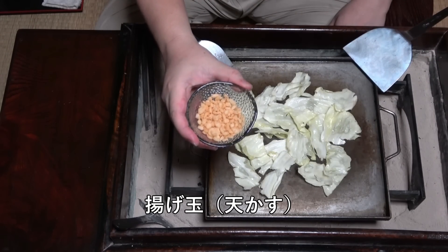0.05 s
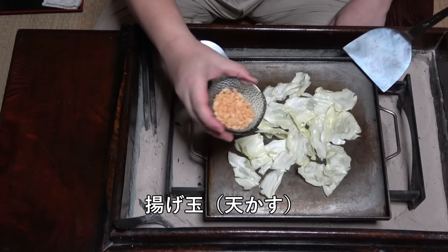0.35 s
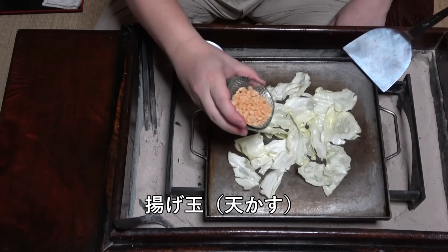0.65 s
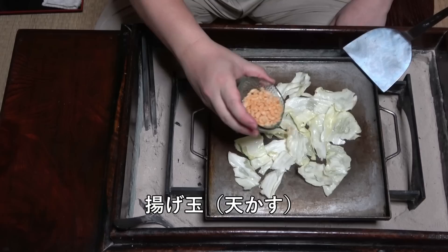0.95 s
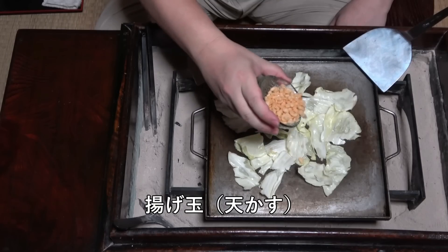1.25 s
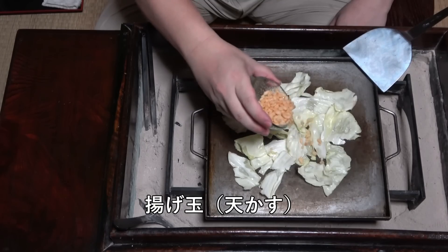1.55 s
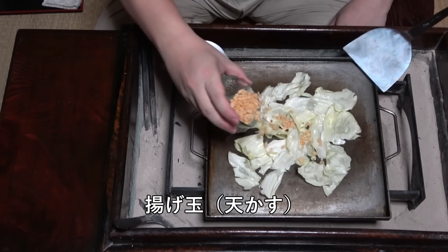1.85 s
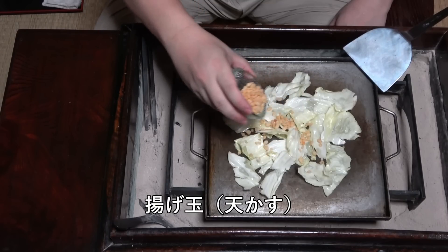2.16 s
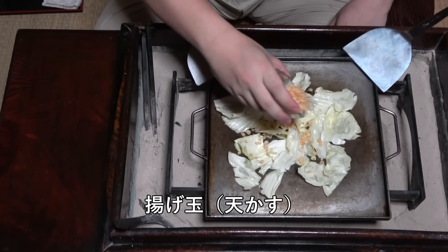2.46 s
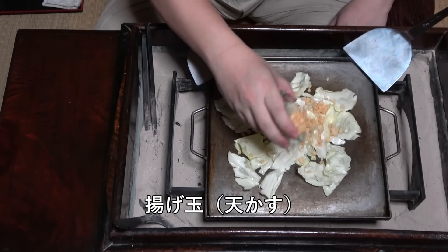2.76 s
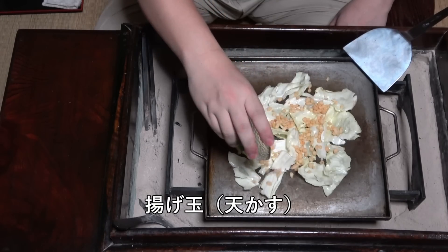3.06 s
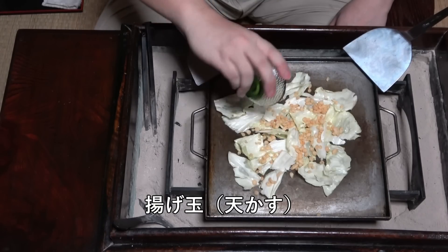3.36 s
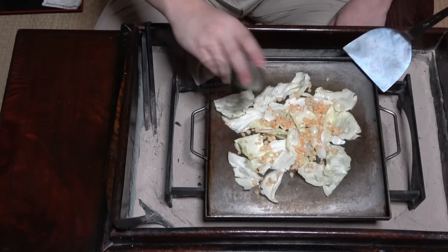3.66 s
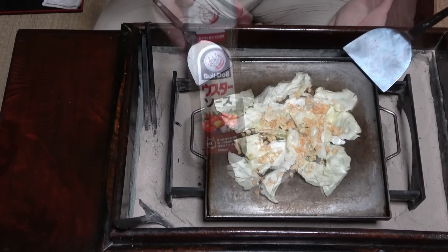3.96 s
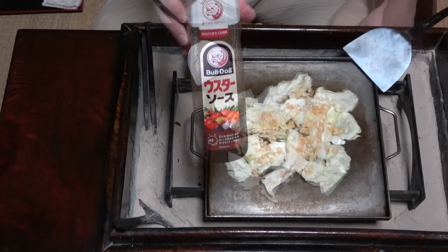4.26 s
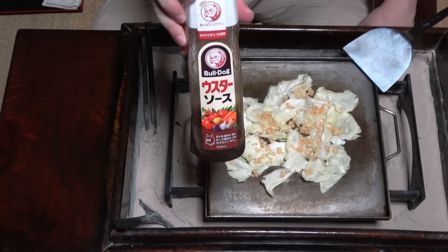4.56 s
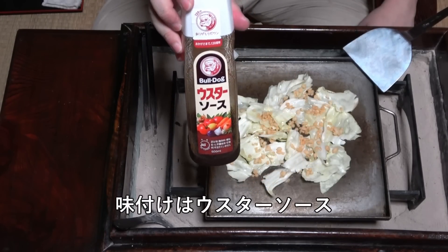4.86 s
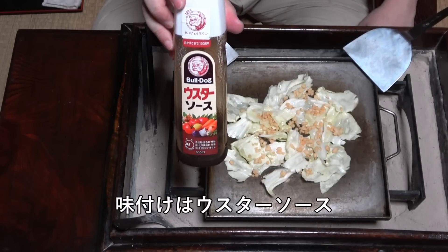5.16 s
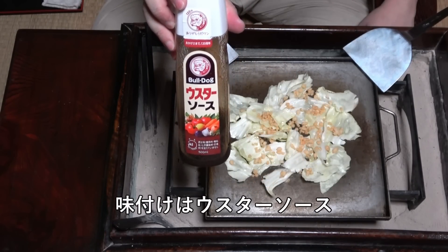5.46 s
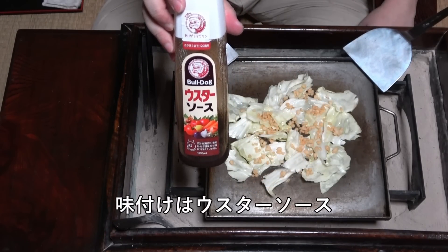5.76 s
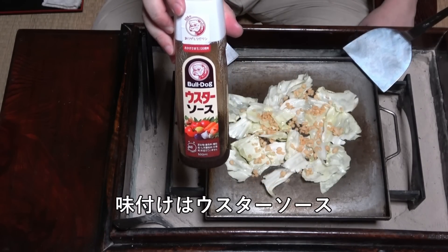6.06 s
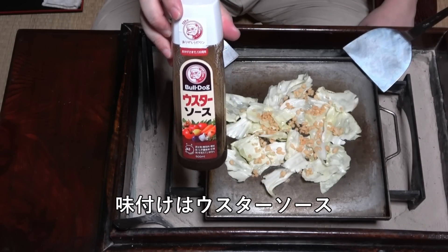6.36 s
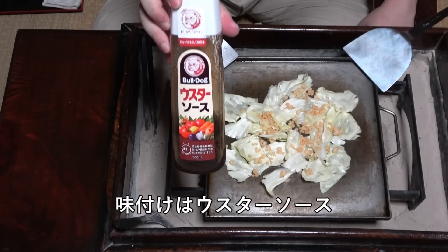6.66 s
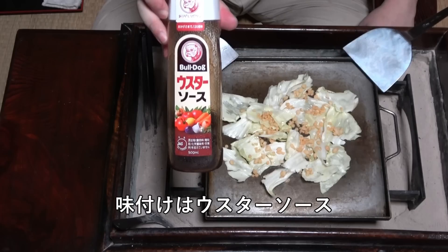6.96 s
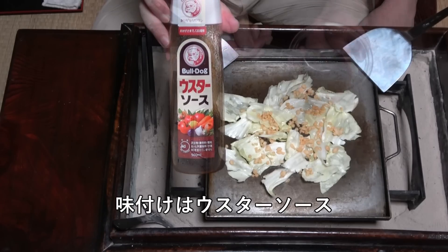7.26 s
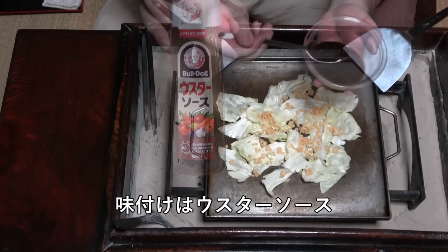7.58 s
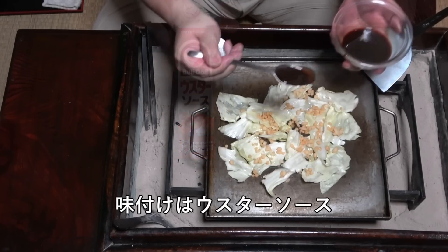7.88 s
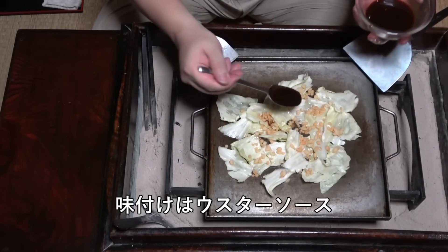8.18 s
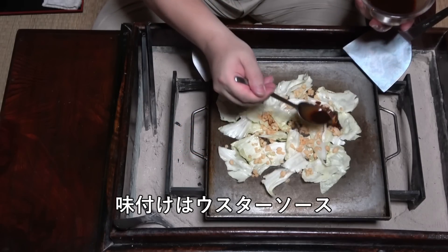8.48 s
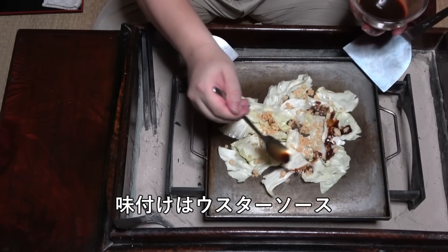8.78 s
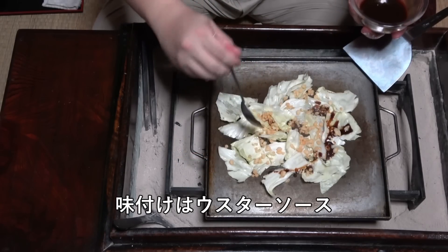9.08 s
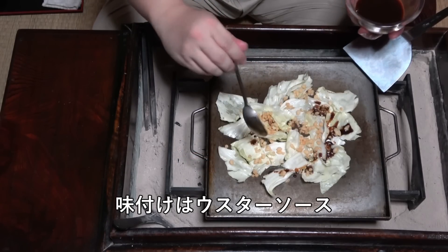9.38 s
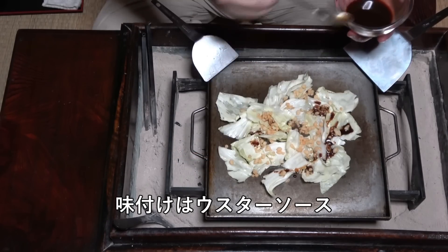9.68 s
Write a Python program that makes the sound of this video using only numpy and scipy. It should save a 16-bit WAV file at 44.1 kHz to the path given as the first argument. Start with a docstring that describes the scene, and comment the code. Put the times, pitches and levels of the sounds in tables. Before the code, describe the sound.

Fine frying on an iron plate with popping water drops, a brief rustle of crumbs, and louder bubbling as sauce is added.

```python
"""A fine sizzle, with water drops popping in oil: cabbage fries on a hot iron griddle in a small room.
It flares where a leaf lets water onto the iron; trapped water sputters and utensils bump softly.
Crumbs rustle out of a small bowl; the sound cuts abruptly to a quieter simmer, and a faint far engine
climbs for a while. Then spooned sauce makes the bubbles crackle ever louder and deeper, and the iron
rings. The plate lies a little to the right of a spaced microphone pair."""
import sys
import numpy as np
from scipy import signal
from scipy.fft import rfft, irfft, next_fast_len
from scipy.io import wavfile

SR = 44100
rng = np.random.default_rng(int(sys.argv[2]) if len(sys.argv) > 2 else 0)


def transcribe(u):
    """Save the signal u as a 16-bit wav file named by the first command-line argument.

    u: samples, shape (n,) or (channels, n), limited to [-1, 1]; the rate is SR.
    q: integer samples, one column per channel.
    """
    v = np.clip(np.atleast_2d(u).T, -1, 1)
    q = np.round(v * 32767).astype(np.int16)
    wavfile.write(sys.argv[1], SR, q)


N = 433503

# sizzle by bubble size: (time [s], large wet bubbles [dB], medium bubbles [dB], finest fizz [dB])
SIZZLE_LEVELS = [(0, -64.5, -55, -60.5), (0.3, -67.5, -65, -62.5), (0.478, -72, -64, -65),
                 (0.651, -66, -61, -61.5), (0.95, -63.5, -58.5, -61), (1.6, -61, -60, -58),
                 (2.0, -62.5, -57, -59.5), (2.55, -58.5, -55, -55.5), (2.8, -52.5, -47.5, -51.5),
                 (3.17, -56.5, -53.5, -56), (3.35, -51, -47.5, -52), (3.697, -55, -49, -52.5),
                 (3.701, -75, -61, -61.5), (3.84, -63, -56, -63), (4.051, -61.5, -56.5, -61.5),
                 (5.0, -65.5, -59, -64.5), (7.0, -64.5, -58, -65), (7.45, -61.5, -56, -62.5),
                 (7.8, -60.5, -57.5, -58.5), (8.01, -58, -52.5, -62), (8.025, -58, -53.5, -54.5),
                 (8.2, -53, -50.5, -52), (8.5, -51.5, -50, -53), (8.75, -50.5, -48, -53.5),
                 (9.28, -44, -43.5, -52), (9.83, -45.5, -42, -50)]
# smooth spectrum of the frying: (frequency [Hz], gain [dB])
FRYING_SPECTRUM = [(40, -59), (110, -26), (170, -18.5), (250, -15.5), (320, -12), (800, -4), (1300, -1),
                   (2200, -3), (4500, -5), (7000, -7), (10000, -7), (13000, -12), (16000, -18.5)]
# peaks and notches of the plate in its wooden hearth: (centre [Hz], width [Hz], gain [dB])
HEARTH_BANDS = [(323, 90, 2.5), (460, 69, 3), (534, 107, -13), (748, 90, 4), (846, 46, -1.5),
                (1270, 96, -3), (1600, 170, 0.5), (2210, 150, -2), (2700, 810, 2), (3270, 330, -1.5),
                (4950, 460, 2.5), (5580, 940, -1.5), (6800, 680, 2.5), (7850, 800, -0.5), (8600, 350, 2)]
# stereo balance of the sizzle: (frequency [Hz], left minus right [dB])
SIZZLE_BALANCE = [(60, 0), (150, -7), (380, 0.5), (950, -1), (2380, 0.5), (5980, -2), (15000, -11)]
# modes of the iron: (frequency [Hz], width [Hz], gain [dB])
IRON_MODES = [(326, 24, -1), (1650, 39, -2), (2330, 22, -6), (2490, 28, -5), (2640, 50, -7.5),
              (2738, 55, -7), (2850, 30, -5.5), (4800, 67, -12), (4910, 64, -15)]
# room decay: (frequency [Hz], T60 [s])
ROOM_DECAY = [(150, 0.017), (1000, 0.16), (5000, 0.16), (15000, 0.043)]
# room noise spectrum: (frequency [Hz], gain [dB])
AIR_SPECTRUM = [(20, -19), (35, -4.5), (65, 1.5), (100, 1.5), (200, 0.5), (350, 0.5), (550, -0.5),
                (1200, 0), (3000, -16), (16000, -16.5)]
# room noise likeness, left to right: (frequency [Hz], coherence [0-1])
AIR_COHERENCE = [(30, 0.5), (120, 0.39), (300, 0.22), (700, 0), (2000, 0.41)]
# loudest water drops in the oil:
# (time [s], level [dB], pitch [Hz], ringing [0-1], thud [dB], snap [dB], left minus right [dB])
LOUD_DROPS = [(0.0861, -33, 4500, 0, -24, -10, -1), (0.1113, -30.5, 2700, 0, -24, -11, -5.5),
              (0.1368, -32, 4940, 0, -31.5, -12, 1), (0.2066, -41, 6700, 1, -33, -5, 0),
              (0.244, -31, 5600, 0, -30, -10, -1), (0.3615, -33.5, 5910, 0.2, -26, -22, -1),
              (0.394, -29.5, 3830, 0.2, -23, -21, -2), (0.4263, -34, 9100, 1, -37, -16, -10),
              (0.505, -33, 7100, 0.4, -36, -20.5, -1), (0.5928, -24.5, 5000, 0.9, -31, -14.5, -5.5),
              (0.7052, -34, 6000, 0.04, -18.5, -14, -5), (0.815, -23.5, 8900, 1, -29, -11, -5),
              (0.832, -26.5, 5270, 1, -38, -15, -8), (1.016, -32, 5370, 1, -28, -14, -6),
              (1.0566, -23, 3920, 0, -32, -22, -4), (1.0638, -35, 4200, 0.1, -22, -18, 1),
              (1.094, -31, 5220, 0.4, -38, -13, -6), (1.1219, -36, 4800, 0.2, -32, -13, -1),
              (1.1267, -28.5, 4530, 0.3, -43, -13.5, -1), (1.2672, -21.5, 2860, 0.5, -26, -22, -3),
              (1.3, -21.5, 5910, 0, -32, -19, 2), (1.31, -31, 6500, 0.2, -25, -8, -3),
              (1.3559, -23, 4770, 0.3, -33, -19, -2), (1.363, -31, 5200, 0.4, -35, -13, -3),
              (1.3762, -23, 4730, 0.2, -31, -22, -3), (1.4156, -24.5, 5150, 0.5, -40, -11, -7),
              (1.433, -24, 4070, 0.4, -36, -12, 1), (1.4507, -24, 4390, 0.4, -27, -26, -1),
              (1.4962, -29, 5730, 0.4, -32, -7.5, -8), (1.5077, -32, 5300, 0.3, -30, -12, -3),
              (1.5466, -28.5, 4460, 0.8, -31, -15, 1), (1.5637, -30, 4600, 0.1, -26, -14, -1),
              (1.5934, -25.5, 3500, 0, -21.5, -17, -1), (1.6438, -30, 6060, 0.5, -35, -9, -9),
              (1.659, -27.5, 4320, 0.1, -35, -14, -3), (1.747, -26.5, 5340, 0.5, -29, -16, -3),
              (1.8244, -29.5, 6760, 0.2, -23.5, -16, -4), (1.8465, -25, 4610, 0, -36, -18, 0),
              (1.864, -30, 5910, 0.4, -29, -11, -2), (1.8775, -31, 3680, 0.2, -36, -16, 3),
              (1.9402, -29.5, 5090, 0.2, -29, -18, 0), (2.0167, -28.5, 4530, 1, -34, -10, -5),
              (2.0412, -29, 9500, 0, -29, -23, -1), (2.0801, -25, 9040, 0.7, -26, -16, -4),
              (2.0963, -31, 9040, 0, -38, -11, 1), (2.1543, -32, 8820, 0.9, -31, -19, -4),
              (2.1702, -27, 6700, 0.1, -29, -14, -5), (2.1894, -26, 4390, 0.5, -28, -25, 0),
              (2.2162, -30, 6700, 0, -23, -23, -6), (2.3188, -36, 5220, 0.8, -38, -18, 0),
              (2.3493, -25.5, 5350, 0, -28, -16, -5), (2.3624, -27, 1700, 0, -24, -21, -6),
              (2.3906, -26, 5250, 0.6, -35, -22, 4), (2.448, -26, 9270, 0, -27, -29, -1),
              (2.4802, -29, 6540, 0.5, -36, -20, -9), (2.4931, -23, 9040, 0.03, -23.5, -15, -3),
              (2.5709, -26, 8300, 1, -29, -18, -7), (2.5986, -25, 5600, 0.8, -38, -34, 6),
              (2.633, -32.5, 9500, 0.8, -18, -15, -7), (2.7139, -20.5, 3680, 0, -25, -12, 0),
              (2.8319, -17.5, 9500, 0.9, -33, -17, -3), (2.8892, -18.5, 2810, 0, -34, -17, -2),
              (2.949, -23.5, 4390, 0.2, -38, -14, -6), (2.9738, -25, 2800, 0.5, -22, -23, -1),
              (3.018, -25.5, 4100, 0.1, -38, -17, -7), (3.0738, -28.5, 9550, 0.6, -26, -16, -10),
              (3.0985, -26.5, 9100, 0.4, -36, -16, -6), (3.1034, -25, 3460, 0, -33, -21, -6),
              (3.1126, -26.5, 1700, 0.1, -31, -25, -3), (3.2025, -23.5, 2630, 0.4, -25, -22, -6),
              (3.249, -27, 4820, 0.4, -50, -34, -7), (3.307, -25.5, 9500, 0.3, -27, -23, -7),
              (3.3462, -19, 3780, 0, -25, -17, 3), (3.449, -30, 9500, 0.7, -38, -14, -9),
              (3.5075, -22.5, 3180, 0.12, -36, -17, -4), (3.5572, -22, 4170, 0.6, -42, -16, 1),
              (3.653, -24, 1720, 0.05, -25, -15, -4), (3.669, -29, 2400, 1, -21, -24, -8),
              (3.6908, -25.5, 4070, 0, -36, -21, -4), (3.758, -28.5, 3120, 0.2, -36, -34, -2),
              (3.7743, -33.5, 6370, 0.1, -23, -10, -3), (3.9174, -22.5, 4470, 0.5, -26.5, -21, -5),
              (4.037, -22.5, 5600, 0.9, -43, -24, -2), (4.11, -25, 2570, 0.06, -23.5, -36, -4),
              (4.2143, -29.5, 3900, 0.4, -30, -24, -2), (4.261, -30.5, 3590, 0.2, -25, -18, -4),
              (4.432, -29.5, 4450, 0.54, -24, -27, -2), (4.4684, -38, 5770, 0, -27, -18, -8),
              (4.584, -25, 3200, 0.04, -28, -12.5, -3), (4.7286, -28, 4500, 0.4, -27.5, -23, -5),
              (5.0597, -34.5, 4970, 0.05, -33, -16, -8), (5.2565, -26.5, 5700, 0.2, -29, -11, -6.5),
              (5.599, -28, 3940, 0.7, -39, -31, -3), (5.697, -35.5, 7220, 0.6, -26, -20, -5),
              (5.743, -35.0, 6600, 0, -36, -8.5, -8), (5.779, -33.5, 2020, 0.2, -18.5, -24, -4),
              (5.8903, -36.5, 6370, 0.9, -38, -14, -8), (5.913, -36, 6370, 0.4, -23, -8, -8),
              (6.1363, -24.5, 4170, 0.4, -35, -18, -6), (6.2593, -29.5, 2770, 0.4, -29, -31, 3),
              (6.3232, -24.5, 6900, 0.6, -35, -10, -5.5), (6.3232, -29.5, 2750, 0.7, -34, -30, -5),
              (6.3635, -27.5, 7400, 0.2, -24, -14, -1), (6.4891, -24.5, 4500, 1, -35, -24, -6),
              (6.5539, -27, 5100, 0.6, -33, -19, -3), (6.602, -26.5, 5380, 0.5, -35, -29, 0),
              (6.6476, -34, 4280, 1, -31, -34, -10), (6.7121, -32, 4390, 0.2, -24, -19, -5),
              (6.9487, -36, 3870, 0.8, -25, -34, -8), (7.0798, -29, 2480, 0.9, -29, -17, -2),
              (7.1402, -28, 5500, 0.2, -27, -17, -2), (7.148, -28.5, 5480, 0.5, -35, -20, 1),
              (7.263, -21.5, 5070, 0.3, -27.5, -14.5, -3.5), (7.2907, -30, 5490, 1, -38, -14, -3),
              (7.3138, -28, 6100, 0.4, -28, -19, -4), (7.43, -31.5, 2870, 0.4, -31, -27, 1),
              (7.4708, -35, 9500, 0.72, -38, -10, -5), (7.5623, -28, 5640, 0.6, -20, -21, -1),
              (7.573, -30, 3990, 0.2, -34, -32, 4), (7.911, -28, 3970, 0, -23, -27, 1),
              (8.02, -19.5, 6540, 0.1, -28.5, -18, -0.5), (8.0804, -25.5, 3710, 0.4, -21.5, -29, -2),
              (8.1514, -24.5, 6750, 0.7, -26, -22, -4), (8.18, -17.5, 2930, 0.45, -29.5, -36, 1),
              (8.592, -19.5, 2800, 0, -38, -37, -4), (8.6255, -21.5, 2420, 0.04, -31, -23, 0),
              (8.646, -28, 3100, 0, -38, -34, -2), (8.7773, -22.5, 1700, 0.3, -22, -41, -9),
              (8.8396, -20, 3300, 0.2, -32, -25, -3), (8.8475, -23, 2660, 0.28, -24, -34, -7),
              (8.878, -26, 3870, 0, -34, -8, -4), (8.8916, -20, 2710, 0.5, -25, -24, -1),
              (8.9255, -23, 2780, 0.9, -19, -36, -2), (8.9705, -19.5, 3470, 0, -41, -36, -7.5),
              (9.005, -21.5, 2790, 0, -38, -27, -2), (9.0303, -16, 2680, 0.4, -26, -33, -4),
              (9.061, -19.5, 2800, 0.5, -34, -27, -1), (9.11, -19.5, 2300, 0.3, -36, -41, -3),
              (9.165, -18.5, 6600, 0.05, -17.5, -27, -3), (9.2027, -23, 9100, 0.94, -38, -13, -7),
              (9.2242, -23, 4000, 0.7, -13.5, -34, -3), (9.238, -16.5, 3580, 0.2, -36, -30, -1),
              (9.3066, -15.5, 4600, 0.2, -17.5, -16, -3.5), (9.4705, -19, 2410, 1, -15.5, -35, 0.5),
              (9.5066, -17.5, 5700, 0.8, -26, -36, -4), (9.5295, -24, 3500, 0.34, -40, -30, 7),
              (9.5566, -17, 4250, 0.9, -35, -34, -2), (9.5825, -20, 2410, 0, -15, -34, 0),
              (9.6166, -27.5, 4170, 0.9, -11, -30, -1), (9.645, -27, 2590, 0.1, -38, -32, 2),
              (9.68, -26, 4700, 0.5, -26, -26, -10), (9.6865, -12.5, 5400, 1, -18, -22, 0.5),
              (9.767, -11.5, 4100, 0.3, -25, -17, -2.5)]
# utensil bumps: (time [s], level [dB])
UTENSIL_BUMPS = [(0.391, -46), (2.712, -43), (2.788, -38.5), (3.345, -43), (4.584, -38.5), (6.091, -45),
                 (6.359, -47), (7.128, -43), (7.77, -42.5), (9.684, -29)]
# simmer under the leaves: (time [s], level [dB])
SIMMER_LEVELS = [(0.7, -74), (1.45, -62), (1.9, -60), (3.8, -64), (4.4, -60), (5.398, -60.5), (6.9, -65),
                 (7.9, -70)]
# flares of water on the iron: (start [s], length [s], lift [dB])
WATER_FLARES = [(0.831, .11, 2.5), (1.245, .26, 3), (3.983, .2, 2.5), (4.573, .08, 3.5), (5.028, .09, 2),
                (5.26, .07, 2.5), (6.05, .17, 1.5), (6.305, .09, 2), (7.057, .14, 2.5), (7.243, .1, 4),
                (7.557, .3, 4.5)]
# runs of tiny spits: (start [s], length [s], level [dB], pitch [Hz])
SPIT_RUNS = [(1.302, .03, -31, 2800), (1.619, .03, -31.5, 4500), (2.828, .02, -22, 6440),
             (3.404, .02, -36, 2600), (4.402, .08, -40.5, 4300), (5.037, 0.037, -41, 4400),
             (5.536, 0.074, -36.5, 4040), (6.045, 0.056, -35, 3880), (6.106, 0.082, -36.5, 3930),
             (6.624, .06, -36, 4130), (6.92, .08, -38, 3880), (7.064, 0.1, -41, 5130),
             (7.601, .17, -35, 6500), (9.316, .03, -24, 3500)]
# sliding crumbs: (time [s], level [dB])
CRUMB_LEVELS = [(2.05, -68), (2.11, -50.5), (2.2, -40), (2.3, -49.5), (2.42, -47.5), (2.8, -50), (3.3, -76)]
# resonances of the crumb bowl: (frequency [Hz], width [Hz], gain [dB])
BOWL_MODES = [(4750, 830, 0), (6530, 1100, -1.5), (8650, 1700, -0.5)]
# far engine: (time [s], level [dB])
ENGINE_LEVELS = [(3.6, -93), (3.75, -78), (5.3, -81), (5.65, -74), (6.199, -79), (6.45, -100)]

SMALL_DROP_HZ, SMALL_SPREAD_OCT = 4300, 0.3  # nearly dry pan
LARGE_DROP_HZ, LARGE_SPREAD_OCT = 2620, 0.12  # wet pan
PULSE_SAMPLES = 512
FFT_SAMPLES = next_fast_len(N + PULSE_SAMPLES)
PULSE_HZ, FFT_HZ = np.fft.rfftfreq(PULSE_SAMPLES, 1 / SR), np.fft.rfftfreq(FFT_SAMPLES, 1 / SR)
TIME_S = np.arange(N) / SR


def amp(db):
    """Decibels to gain."""
    return 10 ** (np.asarray(db) / 20)


def unit_rms(x):
    """Scale to an rms of one."""
    return x / np.sqrt(np.mean(x ** 2) + 1e-20)


def at_hz(table, hz):
    """Table value on a log-frequency axis."""
    knots_hz, values = np.transpose(table)
    return np.interp(np.log(hz + 1), np.log(knots_hz + 1), values)


def envelope(table):
    """Gain from (time [s], level [dB]) rows; silent outside them."""
    return amp(np.interp(TIME_S, *np.transpose(table), left=-np.inf, right=-np.inf))


def wander(per_s):
    """Random curve through per_s normal values a second."""
    return np.interp(TIME_S * per_s, np.arange(1024), rng.standard_normal(1024))


def below(hz, edge_hz, order=6):
    """Soft low-pass magnitude."""
    return 1 / (1 + (hz / edge_hz) ** order)


def pan(left_db):
    """Stereo gain rows for a left-minus-right level."""
    return amp(np.vstack([left_db, -left_db]) / 2)


def add(mix, start_s, sound):
    """Mix in a stereo sound at start_s."""
    part = mix[:, max(round(start_s * SR), 0):][:, :sound.shape[1]]
    part += sound[:, :part.shape[1]]


def causal(magnitude):
    """Minimum-phase spectrum: rings only after the blow."""
    cepstrum = irfft(np.log(np.maximum(magnitude, 1e-4)))
    half = len(cepstrum) // 2
    cepstrum[1:half] *= 2
    cepstrum[half + 1:] = 0
    return np.exp(rfft(cepstrum))


def resonances(bands, hz, scale=float):
    """Sum of bell curves, each scale(dB) high."""
    return sum(scale(db) / (1 + (2 * (hz - centre) / width) ** 2) for centre, width, db in bands)


def plate_colour(hz):
    """Gain that plate and hearth give to sounds on them."""
    return amp(at_hz(FRYING_SPECTRUM, hz) + resonances(HEARTH_BANDS, hz))


def mic_paths(scatter=0.71, scatter_ms=1.0, echo=0.47, lag_ms=0.381, jitter_ms=0.073):
    """Spectra from one spot to both microphones: direct sound, leaf scatter, hearth echo."""
    time_ms = np.arange(PULSE_SAMPLES) / SR * 1000
    leaves = rng.standard_normal((2, PULSE_SAMPLES)) * np.exp(-time_ms / scatter_ms)
    leaves /= np.linalg.norm(leaves, axis=1, keepdims=True)
    scattered = rfft(leaves) * (1 - below(PULSE_HZ, 300, order=2))
    phase_per_ms = -2j * np.pi * PULSE_HZ / 1000
    hearth = echo * np.exp(phase_per_ms * rng.uniform(1.413, 5))
    delay_ms = np.array([[lag_ms + jitter_ms * rng.standard_normal()], [0]])
    return (1 + scatter * scattered + hearth) * np.exp(phase_per_ms * delay_ms)


def crackle(magnitudes, per_s, size_cap, clump=0.4):
    """Clumped random bursts at unit rms, mostly tiny; each magnitude sounds from its own spot."""
    pulses = np.array([irfft(causal(magnitude) * mic_paths()) for magnitude in magnitudes])
    clumps = np.interp(np.arange(N), np.linspace(0, N, 400), rng.standard_normal(400))
    onsets = np.flatnonzero(rng.random(N) < per_s * np.exp(clump * clumps) / SR)
    sizes = np.minimum(rng.exponential(1, N)[onsets], size_cap) * rng.choice([-1, 1], N)[onsets]
    bursts = sizes[:, None, None] * pulses[rng.integers(0, len(pulses), N)[onsets]]
    samples = (onsets[:, None] + np.arange(PULSE_SAMPLES)).ravel()
    return unit_rms(np.array([np.bincount(samples, bursts[:, ch].ravel(), N)[:N] for ch in range(2)]))


def bubble(pitch_hz, q, click):
    """Magnitude of a bursting bubble: a resonance on a click that also pushes on the plate."""
    detune = (PULSE_HZ + 1) / pitch_hz - pitch_hz / (PULSE_HZ + 1)
    return click * (1 + below(PULSE_HZ, 3600, order=4)) + 1 / np.sqrt(1 + (q * detune) ** 2)


def hiss(lag_ms=0.376):
    """Countless tiny bubbles; their lows reach both microphones much alike, the right first."""
    common, separate = rfft(rng.standard_normal((2, FFT_SAMPLES)))
    coherence = 0.66 * below(FFT_HZ, 3200, order=2)
    left = common * np.exp(-2j * np.pi * FFT_HZ * lag_ms / 1000)
    right = coherence * common + np.sqrt(1 - coherence ** 2) * separate
    return irfft(np.array([left, right]), FFT_SAMPLES)[:, :N]


def sizzle(wet_db, medium_db, fine_db, hiss_gain=0.41, calm_db=-64, room_db=-10):
    """Smooth hiss when nearly dry; the harder it fries, the more single bubbles stand out."""
    grain = amp(np.clip(0.41 * (fine_db - calm_db), 0, 7) - 11)
    bubbles = [bubble(hz, q=2.1, click=0.48) for hz in np.geomspace(900, 14000, 90)]
    bursts = crackle(bubbles, per_s=750, size_cap=4.64)
    fry = (grain * bursts + hiss_gain * hiss()) / np.hypot(grain, hiss_gain)
    fry += amp(room_db) * shifting_room(fry)
    spectra = rfft(fry, FFT_SAMPLES) * plate_colour(FFT_HZ) * pan(at_hz(SIZZLE_BALANCE, FFT_HZ))
    deep, low, high = below(FFT_HZ, 670), below(FFT_HZ, 3070, 12), 1 - below(FFT_HZ, 7170, 12)
    shares = deep, low - deep, 1 - low - high, high
    thuds, body, middle, top = (irfft(spectra * share, FFT_SAMPLES)[:, :N] for share in shares)
    body = body + thuds * amp(0.36 * (wet_db - wet_db.mean()))  # bigger bubbles shake the plate more
    bands = (body, wet_db - 0.5), (middle, medium_db + 1), (top, fine_db + 0.55)
    return sum(amp(db) * band / band.mean(0).std() for band, db in bands)


def room(x, onset_s=0.01):
    """Short diffuse tail, longest in the midrange."""
    hz, t, noise = signal.stft(rng.standard_normal((2, SR // 3)), SR, nperseg=256)
    decay = amp(-60 * t / at_hz(ROOM_DECAY, hz)[:, None])
    _, tail = signal.istft(noise * decay, SR, nperseg=256)
    tail *= np.minimum(np.arange(tail.shape[1]) / SR / onset_s, 1)
    return signal.oaconvolve(x, tail / np.linalg.norm(tail[0]), axes=1)[:, :N]


def shifting_room(x, cycle_hz=3.1):
    """Bubbles move about the plate, so the room answers through two tails in turn."""
    angle = np.pi * cycle_hz * TIME_S
    return sum(room(x * np.cos(angle + offset)) for offset in (0, np.pi / 2))


def air(level_db=-66):
    """Soft steady room noise, partly alike in both microphones."""
    left, separate = rfft(rng.standard_normal((2, FFT_SAMPLES)))
    coherence = at_hz(AIR_COHERENCE, FFT_HZ)
    right = coherence * left + np.sqrt(1 - coherence ** 2) * separate
    spectra = np.array([left, right]) * amp(at_hz(AIR_SPECTRUM, FFT_HZ))
    return amp(level_db) * unit_rms(irfft(spectra, FFT_SAMPLES)[:, :N]) * pan(-0.56)


def oil_ticks(fine_db, fade_s=2.2):
    """Dry wide-band ticks of oil on bare iron; they fade as crumbs cover the pan."""
    colour = plate_colour(PULSE_HZ) * (1 - below(PULSE_HZ, 1900, order=2))
    bubbles = [colour * bubble(hz, q=1.7, click=0.25) for hz in np.geomspace(2800, 13000, 40)]
    ticks = crackle(bubbles, per_s=82, size_cap=2.4, clump=0.42)
    fade = 1 / (1 + (TIME_S / fade_s) ** 4)
    return ticks * amp(fine_db + 3) * fade * pan(-4)


def iron_ring(x, wet_db, dry_db=-61, soaked_db=-51, spot_db=8, spots_per_s=40):
    """Bursts ring the iron, more so in a wet pan; each spot favours other modes."""
    drive = x * np.interp(wet_db, [dry_db, soaked_db], [0.2, 1])
    out = np.zeros((2, N))
    for hz, width_hz, db in IRON_MODES:
        mode = signal.iirpeak(hz, hz / width_hz, fs=SR)
        out += signal.lfilter(*mode, drive * amp(db + spot_db * wander(spots_per_s)))
    return out


def pop_pulse(spectra, energy_s=0.0003):
    """Stereo pulse with the energy of a unit level held for energy_s."""
    pulse = irfft(spectra)
    return pulse * np.sqrt(energy_s * SR / (pulse ** 2).mean(0).sum())


def drop_burst(pitch_hz, ringing, thud_db, snap_db):
    """One drop bursts: a click or short ring at the bubble's pitch, a plate thud, a bright snap."""
    colour = plate_colour(PULSE_HZ)
    paths = mic_paths(scatter=0.75, scatter_ms=0.67, echo=0.38)
    low, high = below(PULSE_HZ, 1360, order=3), 1 - below(PULSE_HZ, 9000, order=5)
    cutoff_hz = min(0.32 * pitch_hz, 1800)  # a bubble sounds little far below its pitch
    band = (1 - low) * (1 - below(PULSE_HZ, cutoff_hz, order=3)) * below(PULSE_HZ, 8660)
    q, click = np.interp(ringing, [0, 1], [0.9, 10.7]), np.interp(ringing, [0, 1], [0.28, 0.033])
    ring = pop_pulse(paths * causal(colour * bubble(pitch_hz, q, click) * band))
    thud = pop_pulse(paths * causal(colour * low))
    spray = mic_paths(scatter=1.2, scatter_ms=1.5)  # flung droplets draw the snap out
    snap = pop_pulse(spray * causal(colour * high))
    return ring + amp(thud_db + 13) * thud + amp(snap_db + 8) * snap


def stray_pops(wet_db, medium_db, fine_db, base_per_s=20, half_large_db=-54, span_db=5):
    """Lesser drops burst at random: more with harder fizz, larger in a wetter pan."""
    out = np.zeros((2, N))
    due = np.cumsum(base_per_s * np.exp(0.09 * (fine_db - fine_db.mean()))) / SR
    draws = rng.standard_normal((int(due[-1]), 6))
    onsets = np.minimum(np.searchsorted(due, np.arange(len(draws)) + draws[:, 0]), N - 1)
    for at, (kind, detune, softness, push, side) in zip(onsets, draws[:, 1:]):
        if kind < (wet_db[at] - half_large_db) / span_db:
            hz, ringing = LARGE_DROP_HZ * 2 ** (LARGE_SPREAD_OCT * detune), 0.87
        else:
            hz, ringing = SMALL_DROP_HZ * 2 ** (SMALL_SPREAD_OCT * detune), 0.24
        drop = drop_burst(hz, ringing, thud_db=-33 + 4 * push, snap_db=-15 + fine_db[at] - medium_db[at])
        add(out, at / SR, amp(medium_db[at] + 14.5 - 2 * softness) * drop * pan(-3 + 3 * side))
    return out


def loud_pops(spit_chance=0.55, spit_db=-11, spit_gap_s=0.0055):
    """The loudest drops in the oil; many throw off a smaller spit just after."""
    out = np.zeros((2, N))
    draws = rng.random((len(LOUD_DROPS), 3))
    for (s, db, hz, ringing, thud_db, snap_db, pan_db), (roll, late, detune) in zip(LOUD_DROPS, draws):
        gain = amp(db - 1) * pan(pan_db)
        add(out, s + 0.0005, gain * drop_burst(hz, ringing, thud_db, snap_db))
        if roll < spit_chance:
            spit = drop_burst(hz * 2 ** (detune - 0.5), ringing, thud_db, snap_db)
            add(out, s + spit_gap_s * (0.5 + late), gain * amp(spit_db) * spit)
    return out


def utensil_bumps(decay_s=0.0072):
    """Dull knocks that die at once in the heavy plate."""
    out, t = np.zeros((2, N)), np.arange(4 * PULSE_SAMPLES) / SR
    hz = np.fft.rfftfreq(len(t), 1 / SR)
    body = causal(plate_colour(hz) * below(hz, 570, order=2) * (1 - below(hz, 133, order=3)))
    for start_s, db in UTENSIL_BUMPS:
        blow = rng.standard_normal(len(t)) + 0.054 * rng.standard_normal((2, len(t)))
        knock = irfft(rfft(blow * np.exp(-t / decay_s)) * body)
        peak = abs(signal.hilbert(knock.mean(0))).max()
        add(out, start_s, amp(db - 3) * knock / peak)
    return out


def simmer(pitch_hz=4300, spread_oct=0.1, surge_db=3, surges_per_s=11):
    """Small bubbles of nearly one size fizz under the leaves in uneven surges."""
    pitches_hz = pitch_hz * 2 ** (spread_oct * rng.standard_normal(40))
    fizz = crackle([bubble(hz, q=4.8, click=0.01) ** 2 for hz in pitches_hz], per_s=420, size_cap=1.7)
    surges = amp(surge_db * wander(surges_per_s))
    return unit_rms(fizz * surges) * envelope(SIMMER_LEVELS) * pan(-3)


def flares_db(rise_share=0.38):
    """A leaf lets water onto the iron: the frying swells fast and dies more slowly."""
    return sum(db * np.sqrt(np.interp(TIME_S - start_s, [0, rise_share * length_s, length_s], [0, 1, 0]))
               for start_s, length_s, db in WATER_FLARES)


def sputters(spits_per_s=62, spread_oct=0.06, spread_db=3):
    """Trapped water escapes from under a leaf in uneven runs of tiny spits."""
    out = np.zeros((2, N))
    for start_s, length_s, db, hz in SPIT_RUNS:
        draws = rng.standard_normal((32, 3))[:round(length_s * spits_per_s)]
        for k, (late, detune, size) in enumerate(draws):
            spit = drop_burst(hz * 2 ** (spread_oct * detune), ringing=0.48, thud_db=-36, snap_db=-30)
            add(out, start_s + (k + 0.3 * late) / spits_per_s, amp(db + spread_db * size) * spit * pan(-3))
    return out


def crumbs():
    """Dry crumbs tick against the thin metal bowl as they slide."""
    bowl = resonances(BOWL_MODES, PULSE_HZ, scale=amp) + 0.014
    return crackle([bowl] * 32, per_s=250, size_cap=3.4) * envelope(CRUMB_LEVELS) * pan(-2)


def sauce_spatter(wet_db):
    """Large sauce drops ring in a narrow band; they come forward as the pan gets wetter."""
    pitches_hz = LARGE_DROP_HZ * 2 ** (LARGE_SPREAD_OCT * rng.standard_normal(48))
    drops = [bubble(hz, q=16, click=0.0075) * below(PULSE_HZ, 6700) for hz in pitches_hz]
    level_db = wet_db - 6 + 0.43 * (wet_db - wet_db.max())
    return crackle(drops, per_s=70, size_cap=1.2, clump=0.51) * amp(level_db) * pan(-1)


def engine(start_hz=102.7, climb_hz_per_s=12.1, fifth_db=-6.5, waver=0.28):
    """Far engine through the walls: two low tones a fifth apart, climbing evenly, unsteady in level."""
    knots_s, start_s = np.linspace(0, TIME_S[-1], 160), ENGINE_LEVELS[0][0]
    sway = [1 + waver * np.interp(TIME_S, knots_s, knots) for knots in rng.standard_normal((2, 160))]
    phase = 2 * np.pi * np.cumsum(start_hz + climb_hz_per_s * (TIME_S - start_s)) / SR
    tones = sway[0] * np.sin(phase) + amp(fifth_db) * sway[1] * np.sin(1.5 * phase)
    return np.sqrt(2) * tones * envelope(ENGINE_LEVELS)


def scene():
    """Griddle in its room; open pops arrive more directly than the frying under the leaves."""
    knots_s, *courses_db = np.transpose(SIZZLE_LEVELS)
    levels_db = np.array([np.interp(TIME_S, knots_s, course) for course in courses_db]) + flares_db()
    wet_db, _, fine_db = levels_db
    rustle = crumbs()
    bed = sizzle(*levels_db) + simmer()
    hits = loud_pops() + utensil_bumps() + stray_pops(*levels_db) + sputters()
    hits += sauce_spatter(wet_db) + oil_ticks(fine_db)
    ring = iron_ring(amp(-7) * bed + hits, wet_db)
    echoes = shifting_room(amp(-10) * rustle + amp(-12) * hits)
    return bed + rustle + hits + ring + echoes + air() + engine()


def record(dry):
    """Steep low-pass at 15.9 kHz."""
    lowpass = signal.firwin(511, 15900, window=("kaiser", 9), fs=SR)
    return signal.oaconvolve(dry, lowpass[None], "same")


dry = scene()
out = record(dry)
transcribe(out)
```